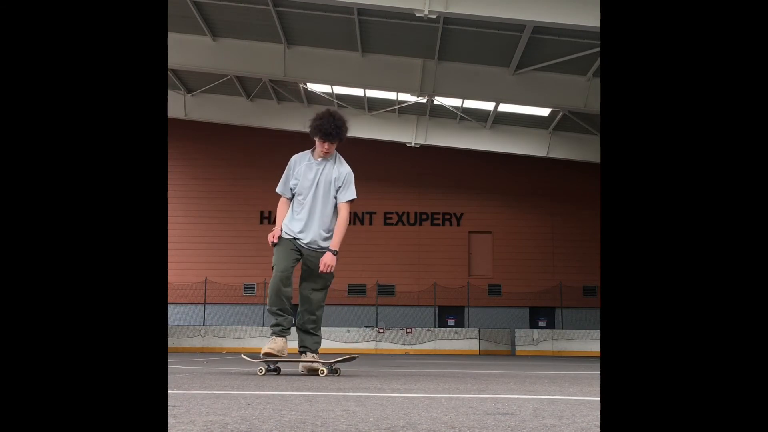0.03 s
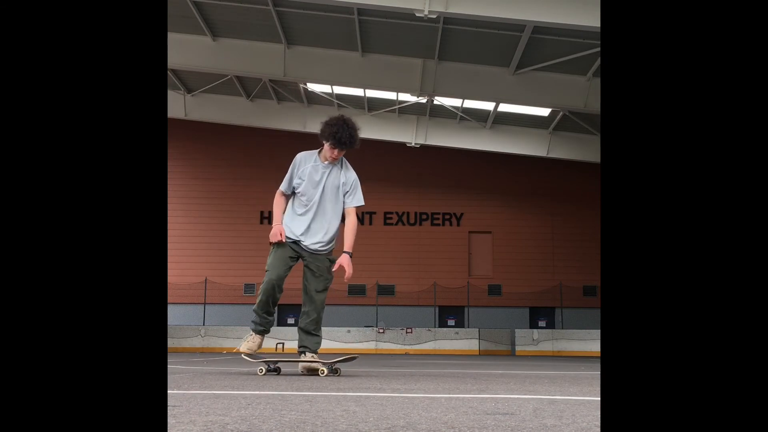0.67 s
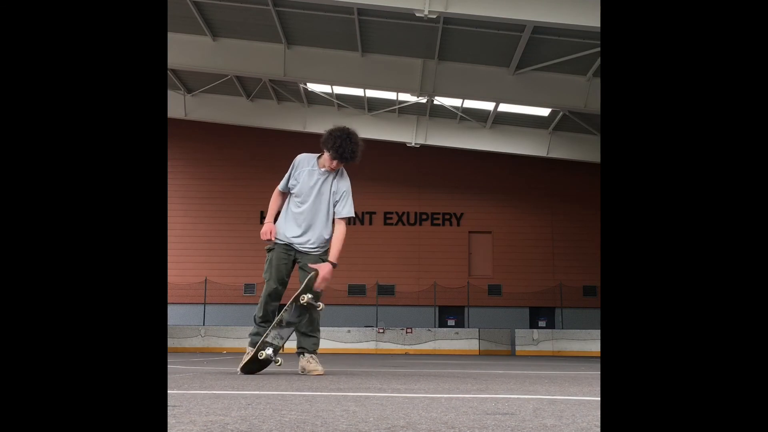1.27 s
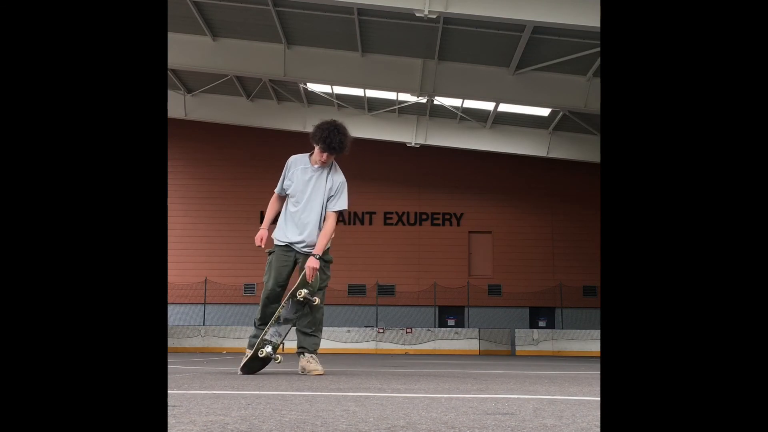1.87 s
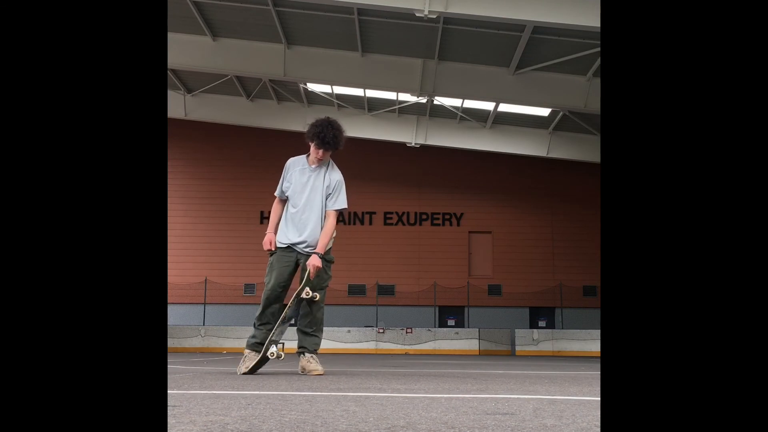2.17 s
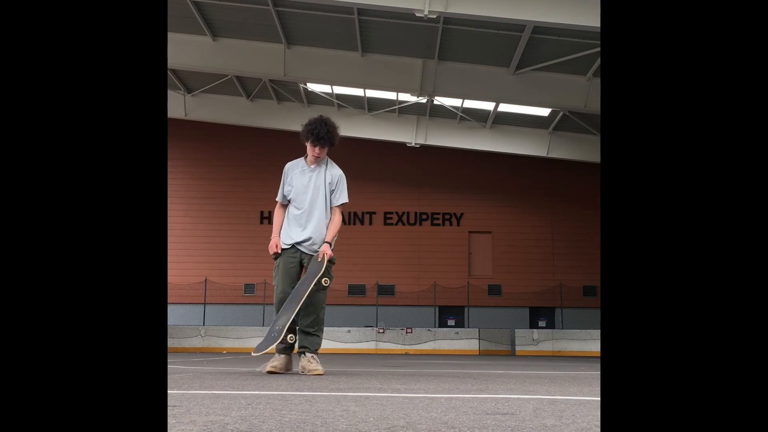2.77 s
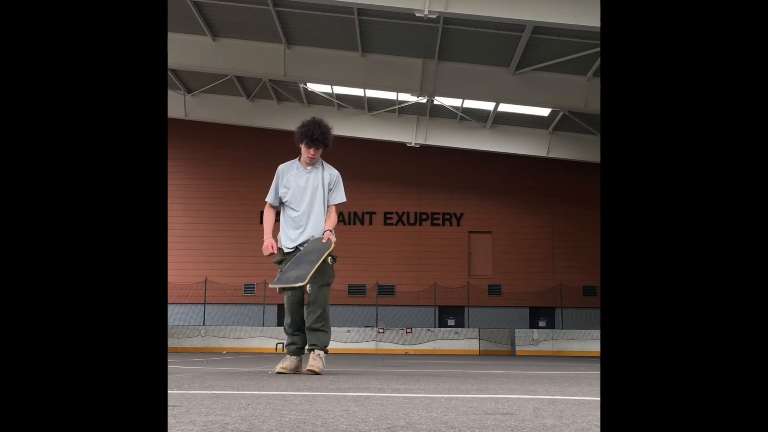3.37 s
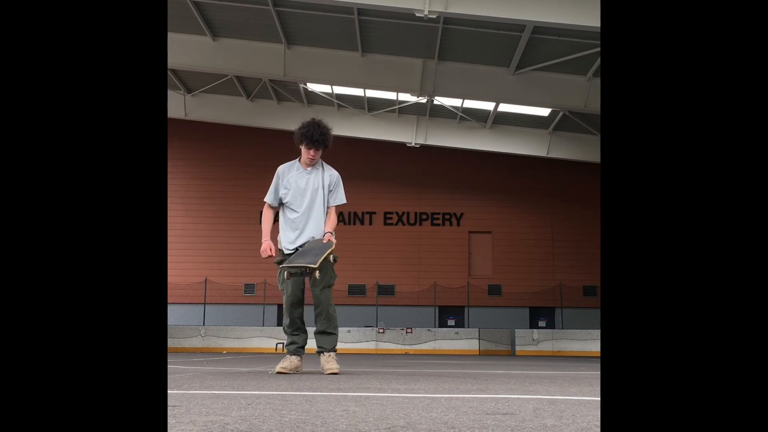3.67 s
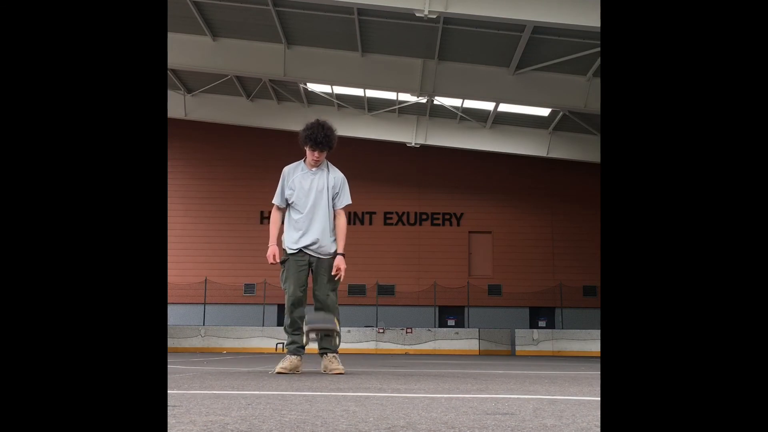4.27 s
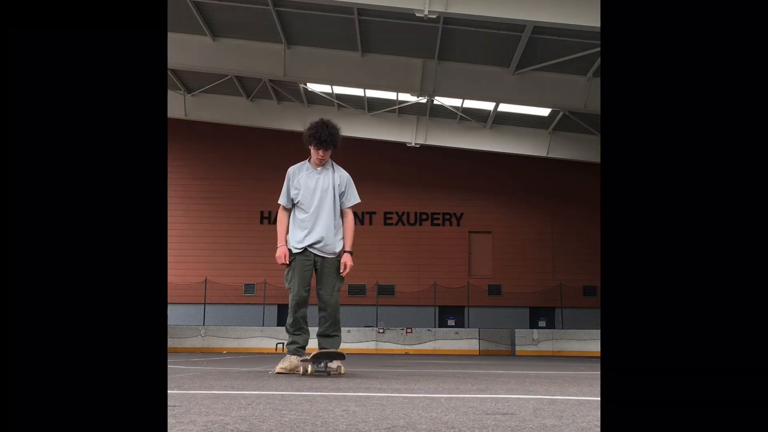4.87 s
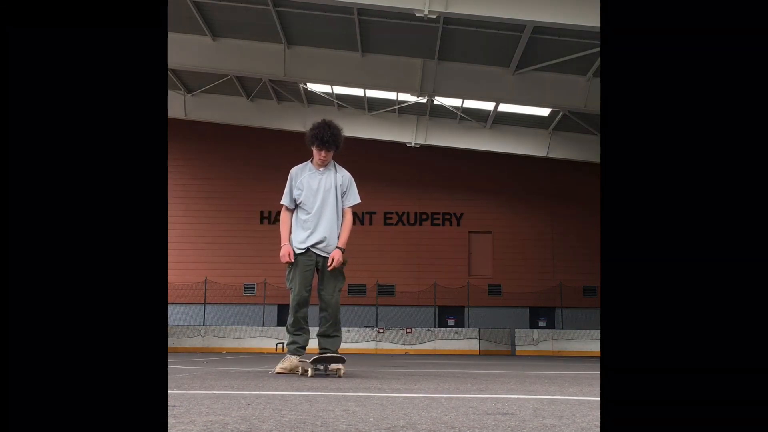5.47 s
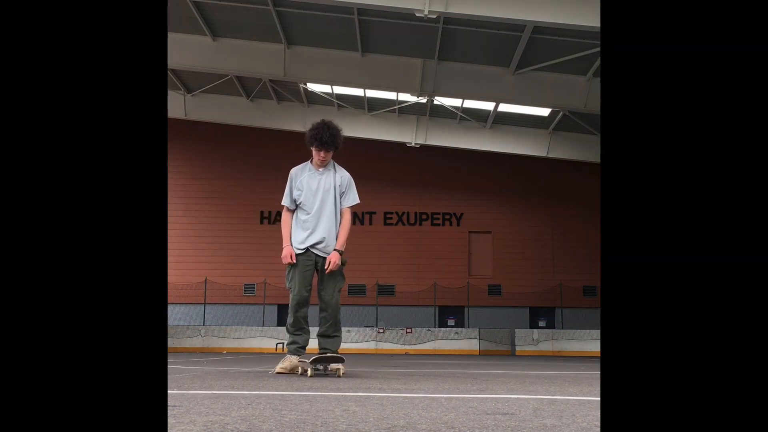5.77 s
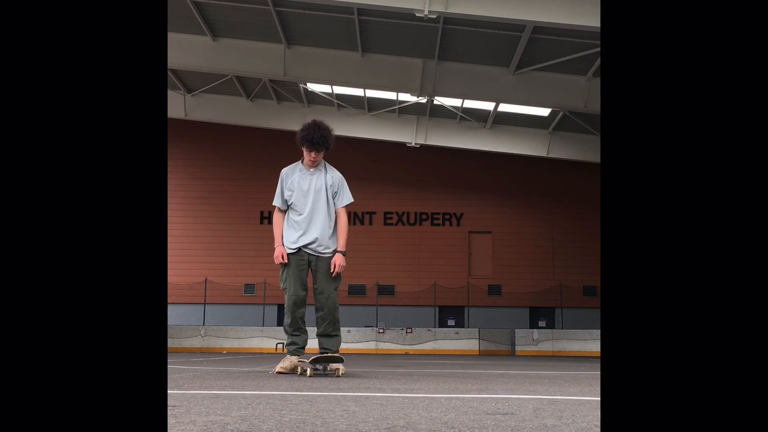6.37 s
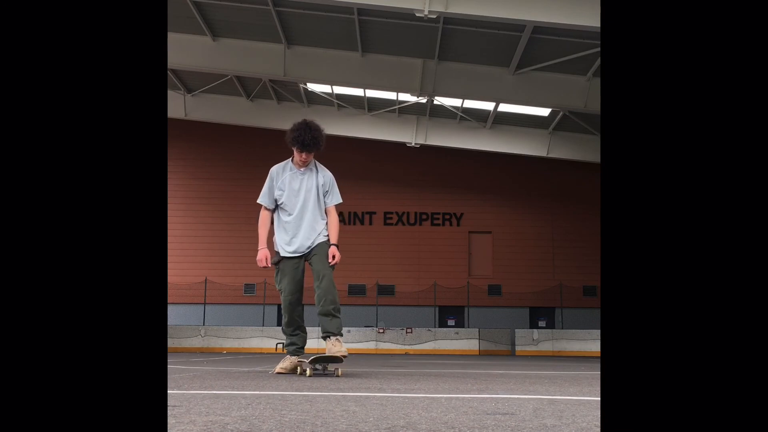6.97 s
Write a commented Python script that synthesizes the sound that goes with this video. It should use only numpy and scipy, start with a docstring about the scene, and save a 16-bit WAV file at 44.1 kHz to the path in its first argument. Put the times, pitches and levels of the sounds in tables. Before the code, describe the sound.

In a big, echoing hall with distant traffic humming low, shoe soles creak very faintly on a skateboard. The tail cracks against the concrete floor and the sound rings away slowly. After a few quiet rubs of cloth and grip tape, the wheels crash down with a thump and a metallic clatter, followed by two lighter bounces. The landing sounds squashed at the microphone, its first echoes almost as loud as the hit.

```python
"""Skateboard pop and drop in a hall

A skater stamps on the tail of his board: wood clacks on concrete and the board flips up, rattling.
He turns it, grip tape brushing his clothes, and drops it on its wheels to land hard and bounce twice.
A large roofed hall throws each blow back from roof and walls, over a long tail and a low traffic hum.
A limiter squashes the landing, so its first echoes sound almost as loud as the blow itself."""
import sys
import numpy as np
from scipy import signal
from scipy.fft import rfft, irfft
from scipy.io import wavfile
from scipy.ndimage import uniform_filter1d, minimum_filter1d

SR = 44100
rng = np.random.default_rng(int(sys.argv[2]) if len(sys.argv) > 2 else 0)


def inscribe(sig):
    """Save sig as 16-bit PCM at rate SR to the path in sys.argv[1].

    A 1-D sig is mono; a 2-D sig holds one channel per row.
    Samples are clipped to [-1, 1] before scaling.
    """
    pcm = np.round(np.clip(np.atleast_2d(sig).T, -1, 1) * 32767)
    wavfile.write(sys.argv[1], SR, pcm.astype(np.int16))


N = 309141
T = np.arange(N) / SR
BLOW_T = T[:SR // 2]
FIRST_HALF = BLOW_T < BLOW_T[-1] / 2  # gate that cuts the wrap-around of an FFT-shaped burst

# modes of the wooden deck: f/Hz, level/dB, t60/s
DECK_MODES = [(235.8, -15, 0.22), (338, -11, 0.078), (363, -20, 0.2), (445, -14.5, 0.056),
              (537.7, -3, 0.073), (601, -13.5, 0.082), (705, -10.5, 0.063), (950, -27.5, .03),
              (1375, -15, 0.026), (2040, -18, 0.027), (2350, -22.5, 0.0087), (2630, -19, .035)]


def undb(db):
    """Decibels to gain."""
    return 10 ** (np.asarray(db) / 20)


def unit(x):
    """Scale to rms 1."""
    return x / np.sqrt(np.mean(x ** 2))


def fade(t, t60):
    """Exponential decay, 60 dB down after t60."""
    return np.exp(-np.log(1000) * t / t60)


def add(out, start, x):
    """Mix x into out from start, in seconds."""
    i = max(int(start * SR), 0)
    out[i:i + len(x)] += x[:N - i]


def lowpass(x, hz, order=2):
    """Smooth roll-off above hz."""
    return signal.sosfilt(signal.butter(order, min(hz, SR / 2 - 1), fs=SR, output="sos"), x)


def on_log_axis(hz, points, values):
    """Join points by straight lines over log frequency."""
    return np.interp(np.log(np.maximum(hz, 1)), np.log(points), values)


def eq_curve(colour, size):
    """Gain per FFT bin for a colour given as f/Hz, level/dB points."""
    return undb(on_log_axis(np.fft.rfftfreq(size, 1 / SR), *np.transpose(colour)))


def noise(colour):
    """A bed of coloured noise at rms 1."""
    return unit(irfft(rfft(rng.standard_normal(N)) * eq_curve(colour, N), N))


def drift(rate):
    """Random wander with a spread near 1 and rate new values a second."""
    steps = rng.standard_normal(int(N / SR * rate) + 2)
    return np.interp(T * rate, np.arange(len(steps)), steps)


def traffic_hum(level_db=-37.5, flutter_db=0.45, ease_from_s=5.87, ease_db_per_s=3):
    """Distant traffic blurred by the hall, steady until it eases off."""
    # colour of the hum: f/Hz, level/dB
    colour = [(13, -37.5), (22, -0.5), (44, -3.5), (81, -9.5), (119, -8), (228, -17.5), (316, -14),
              (358, -10), (608, -11.5), (672, -11.5), (842, -16), (1390, -30.5), (2480, -49.5), (6290, -61),
              (8950, -67.5), (11600, -96), (19700, -120)]
    eased_db = ease_db_per_s * np.maximum(T - ease_from_s, 0)
    return noise(colour) * undb(level_db - eased_db + flutter_db * drift(rate=23))


def sole_creaks(slip_db=4, slip_rate=250):
    """Rubber soles stick and slip on the deck as the weight shifts: a thin, uneven crackle."""
    # shifts of weight: t/s, length/s, level/dB
    shifts = [(.06, 0.057, -60), (0.198, 0.026, -73), (.364, .025, -66), (0.413, 0.086, -72),
              (.78, .12, -63)]
    # colour of a creak: f/Hz, level/dB
    colour = [(2000, -16), (3500, -2), (4800, -15.5), (6300, 5.5), (7600, -6.5), (9000, -13), (11000, -28)]
    pressure = sum(undb(db) * np.sin(np.pi * np.clip((T - start) / length, 0, 1))
                   for start, length, db in shifts)
    return pressure * unit(noise(colour) * undb(slip_db * drift(slip_rate)))


def scuffs(grain_db=3, grit_rate=900, top_db=-22, body_db=-4.0):
    """Rough surfaces catch and slip in tiny grains; each rub starts fast and dies away."""
    # grip tape, shoes and cloth rubbing: t/s, length/s, level/dB, centre/Hz
    rubs = [(0.686, 0.027, -52, 3300), (0.865, 0.19, -64.5, 3540), (1.312, 0.044, -55.5, 5864),
            (2.802, 0.04, -59.5, 4430), (2.839, 0.1, -62.5, 4400), (3.65, 0.1, -64.5, 4700),
            (3.733, .13, -62, 4640), (3.97, 0.0075, -66, 7000), (4.356, 0.0089, -52.5, 3800)]
    out = np.zeros(N)
    grains = undb(grain_db * drift(grit_rate) + 1.5 * drift(rate=110))
    for start, length, db, hz in rubs:
        colour = [(hz / 8, 4 * body_db), (hz / 2, body_db), (hz, 0),
                  (hz * 1.14, top_db / 4), (hz * 2, top_db)]
        age = np.maximum(T - start, 0) / length
        envelope = np.minimum(age / 0.1, 1) * np.exp(-age ** 3)
        out += undb(db) * grains * noise(colour) * envelope
    return out


def ring(modes, detune, damping=1):
    """Struck modes, neighbours in opposite phase; the load of each blow retunes and damps them."""
    shifts = 1 + detune * rng.standard_normal(len(modes))
    return sum((-1) ** k * undb(db) * fade(BLOW_T, t60 / damping)
               * np.sin(2 * np.pi * hz * shifts[k] * BLOW_T)
               for k, (hz, db, t60) in enumerate(modes))


def crack(colour, snap_t60, rattle_db, rattle_t60):
    """The contact itself: a sharp, unpitched snap, then the dense, weaker ring of plies and hardware."""
    decay = fade(BLOW_T, snap_t60) + undb(rattle_db) * fade(BLOW_T, rattle_t60)
    size, strength = len(decay), np.linalg.norm(decay)
    burst = rfft(rng.standard_normal(size) * decay)
    # so many modes overlap that the timing is random but the spectrum is smooth
    flattened = burst / np.hypot(np.abs(burst), strength / 2)
    snap = irfft(eq_curve(colour, size) * flattened, size) * FIRST_HALF
    return snap * strength / np.linalg.norm(snap)


def tail_knocks():
    """Bare wood on concrete: only the deck rings, and soft contacts are duller. Returns ring, crack."""
    # the tail strikes, chatters and taps once more: t/s, ring/dB, crack/dB, contact cut-off/Hz
    knocks = [(0.9812, -5, -1.5, 3100), (0.9869, -6, -19, 8246), (1.009, -31.5, -28.5, 6920),
              (1.0382, -16.5, -20.5, 2800), (1.0449, -36, -29, 9000)]
    # colour of the crack of wood on concrete: f/Hz, level/dB
    colour = [(70, -25.5), (150, 3), (260, -4), (700, 10), (1150, 2.5), (1500, -1), (2700, -2.5),
              (3800, -4.5), (9000, -8.5), (12000, -32)]
    rings, cracks = np.zeros((2, N))
    for start, ring_db, crack_db, contact_hz in knocks:
        snap = undb(crack_db) * crack(colour, snap_t60=0.019, rattle_db=-23.5, rattle_t60=0.02)
        deck = undb(ring_db) * ring(DECK_MODES, detune=0.0088)
        add(rings, start, lowpass(deck, contact_hz, order=3))
        add(cracks, start, lowpass(snap, contact_hz, order=4))
    return rings, cracks


def hardware_rattles(tick_rate=900, scatter_db=4):
    """Loose bearings and washers tick at random as the board leaves the floor, ever more softly."""
    # jolts that set them rattling: t/s, level/dB, t60/s
    jolts = [(0.99, -42, 0.8), (4.885, -41, 0.62), (5.06, -44, 0.49)]
    # colour of a tick: f/Hz, level/dB
    colour = [(800, -20), (2500, 2.5), (4500, 2.5), (6500, 0.5), (9000, -12.5), (11000, -33)]
    hits = rng.random(N) < tick_rate / SR
    strengths = undb(scatter_db * np.clip(rng.standard_normal(N), -2, 2))
    tick = crack(colour, snap_t60=0.01, rattle_db=-13.5, rattle_t60=0.033)
    shaking = sum(undb(db) * (T > start) * fade(np.maximum(T - start, 0), t60)
                  for start, db, t60 in jolts)
    return shaking * unit(signal.fftconvolve(hits * strengths, tick)[:N])


def wheel_landings(detune=0.03, truck_db=-5.5, thump_db=-8, crack_db_per_octave=10.5):
    """Each wheel contact thumps, shakes the trucks and rings the deck. Returns ring, crack."""
    # wheels meet the floor in the landing and two rebounds: t/s, strength/dB, contact cut-off/Hz
    contacts = [(4.4021, -4.5, 8350), (4.4053, -0.5, 4700), (4.41, -0.5, 3100), (4.422, -3, 3530),
                (4.4334, 2, 3650), (4.443, -2, 1600), (4.449, -1.5, 2380), (4.8833, -14.5, 5430),
                (4.9091, -14.5, 5500), (4.9134, -16.5, 5870), (4.926, -17.5, 3147), (5.0915, -25, 7000),
                (5.135, -17.5, 1100)]
    # modes of the metal trucks and axles: f/Hz, level/dB, t60/s
    truck_modes = [(288, -8, 0.16), (410.7, -20, 0.17), (759.6, -2, .11), (1098, -12, 0.3),
                   (1328, -3.5, 0.032), (1525, -23, .13), (1663, -11, 0.08), (1836.6, -5, 0.052),
                   (2375, -22.5, .12), (2475, -14.5, .09), (2740, -16, 0.29), (3190, -24, 0.19),
                   (3500, -9, 0.097), (4170, -13, 0.12), (4620, -17.5, 0.1), (4350, -23, 0.14),
                   (5390, -20, 0.066), (5850, -22, 0.42)]
    # the board bobbing on its rubber wheels and bushings: f/Hz, level/dB, t60/s
    wheel_modes = [(86, -7, 0.16), (110.4, -1.5, 0.098), (158, -7.5, 0.15)]
    # colour of the crack of wheels and hardware: f/Hz, level/dB
    colour = [(60, -30.5), (250, 11.5), (700, 12), (1100, -5), (1800, -3.5), (2800, 0.5), (5000, -4.5),
              (7000, -10.5), (9000, -19), (12000, -35)]
    damping = 1.7  # on its wheels the board rings this many times shorter than in the air
    rings, cracks = np.zeros((2, N))
    for start, db, contact_hz in contacts:
        deck = ring(DECK_MODES, detune, damping)
        trucks = undb(truck_db) * ring(truck_modes, detune, damping)
        thump = undb(thump_db) * ring(wheel_modes, detune)
        crack_db = -1.5 + crack_db_per_octave * np.log2(contact_hz / 4200)  # harder hits crack more
        snap = undb(crack_db) * crack(colour, snap_t60=0.022, rattle_db=-17.0, rattle_t60=0.17)
        add(rings, start, undb(db) * lowpass(deck + trucks + thump, contact_hz))
        add(cracks, start, undb(db) * lowpass(snap, contact_hz))
    return rings, cracks


def echo(smear_t60, hz):
    """A reflection from a ribbed surface: spread in time, even in colour, duller above hz."""
    scatter = rfft(rng.standard_normal(len(BLOW_T)) * fade(BLOW_T, smear_t60))
    even = irfft(scatter / np.abs(scatter), len(BLOW_T)) * FIRST_HALF
    return lowpass(even / np.linalg.norm(even), hz)


def hall(send, build_s=0.027, patchy_db=1.5, early_db=-7):
    """A diffuse tail whose treble dies first, with dull, smeared echoes from the big surfaces."""
    # the hall's reverb tail: f/Hz, level/dB, t60/s
    reverb = [(55, -21, 2.2), (128, 4.5, 3.6), (268, -2, 5.5), (524, -2.5, 4.9), (786, -3.5, 5.47),
              (1320, -1.5, 4.05), (2430, -16, 3.24), (4170, -8.5, 0.89), (8460, -18.5, 0.65)]
    # echoes from roof, beams and far wall: delay/s, level/dB, smear t60/s, cut-off/Hz
    echoes = [(0.092, -6.5, .018, 1100), (.109, -11, 0.018, 1100), (0.172, -23, .04, 4000),
              (0.205, -24, 0.033, 5000), (.212, -10, .015, 850), (.342, -24.5, .05, 1404),
              (.483, -17, 0.13, 1800), (.6, -17.5, 0.077, 800)]
    points, dbs, t60s = np.transpose(reverb)
    freqs = np.fft.rfftfreq(N, 1 / SR)
    centres = np.geomspace(50, 10000, 16)
    before_roof = T < echoes[0][0]  # the tail stays thin until the sound is back from the roof
    wash = rfft(rng.standard_normal(N) * undb(patchy_db * drift(rate=90) + early_db * before_roof))
    response = np.zeros(N)
    for hz, share in zip(centres, np.eye(len(centres))):
        band = irfft(wash * on_log_axis(freqs, centres, share), N)
        decay = fade(T, on_log_axis(hz, points, t60s)) * (1 - np.exp(-T / build_s))
        response += undb(on_log_axis(hz, points, dbs)) * band * decay / np.linalg.norm(decay)
    for delay, db, smear_t60, hz in echoes:
        add(response, delay, undb(db) * echo(smear_t60, hz))
    return signal.fftconvolve(send, response)[:N]


def scene():
    """The board, the hall and the hum in mono; cracks spread all round and feed the hall most."""
    tail_ring, tail_crack = tail_knocks()
    drop_ring, drop_crack = wheel_landings()
    handling = scuffs() + sole_creaks() + hardware_rattles()
    stems = np.array([tail_ring, tail_crack, drop_ring, drop_crack, handling])
    sends_db = [-5.5, -1.0, -5.5, -0.5, -4]  # one reverb send per stem
    return (stems.sum(axis=0) + hall(undb(sends_db) @ stems) + traffic_hum())[None]


def record(dry):
    """A limiter holds peaks at full scale and ducks briefly after the hardest; the top is cut off."""
    duck_above_db, release_db_per_s, top_hz = 3.5, 190, 9200
    over_db = 20 * np.log10(np.maximum(np.abs(dry) / undb(duck_above_db), 1))
    recovery_db = release_db_per_s * T
    duck = undb(recovery_db - np.maximum.accumulate(over_db + recovery_db, axis=-1))
    gain = np.minimum(duck, 1 / np.maximum(np.abs(dry), 1))
    gain = uniform_filter1d(minimum_filter1d(gain, size=21), size=21)  # ease in just ahead of a peak
    high_cut = signal.ellip(10, 0.2, 70, top_hz, fs=SR, output="sos")
    return signal.sosfilt(high_cut, dry * gain)


dry = scene()
out = record(dry)
inscribe(out)
```